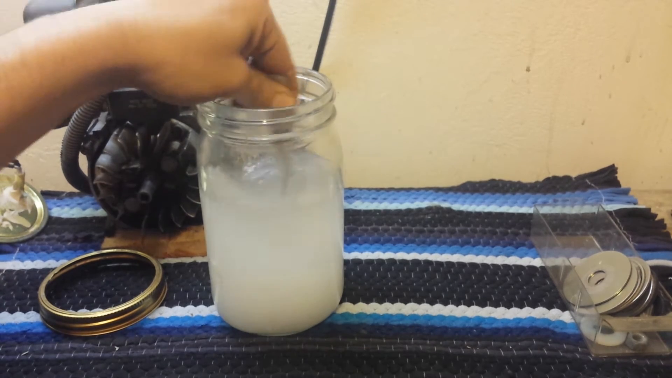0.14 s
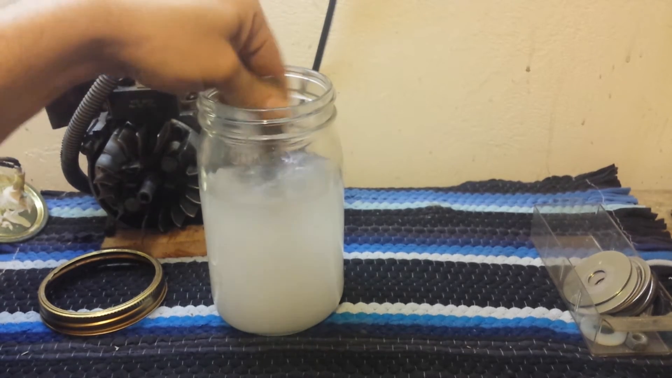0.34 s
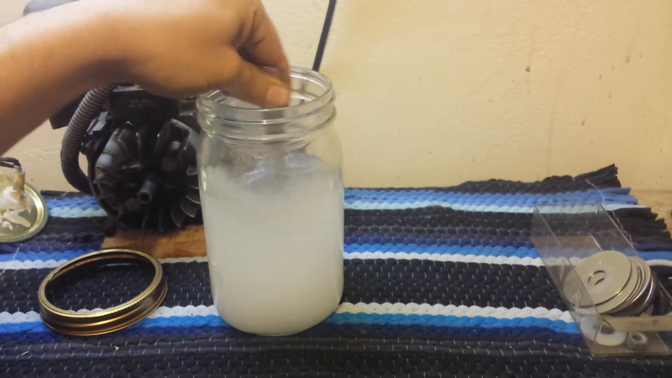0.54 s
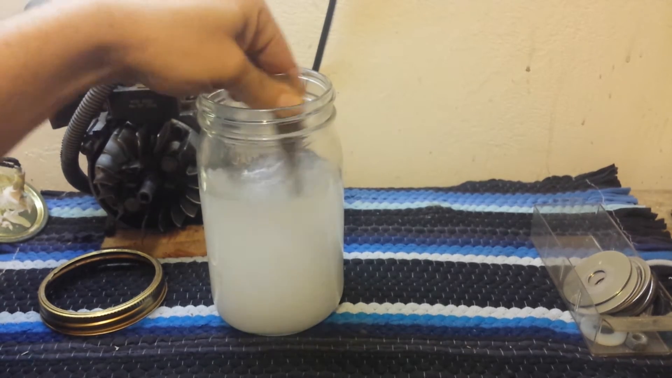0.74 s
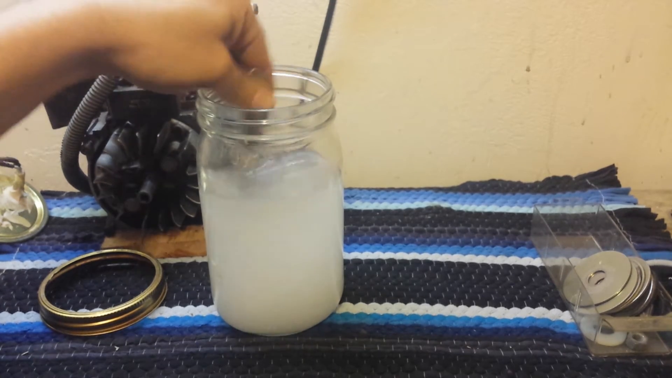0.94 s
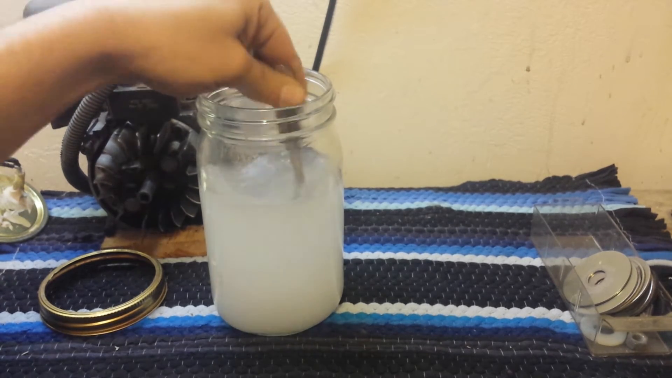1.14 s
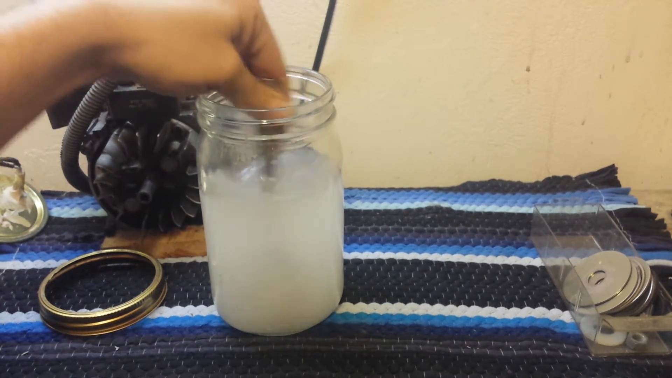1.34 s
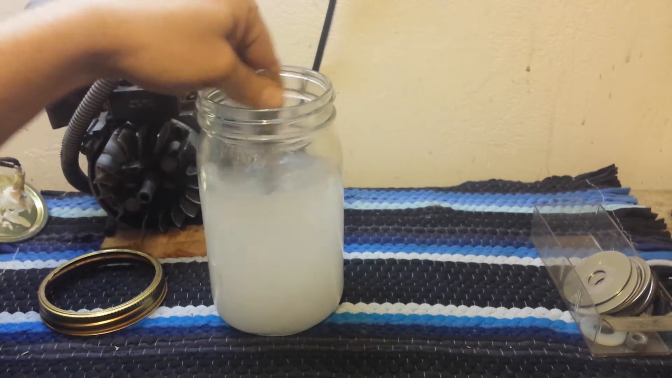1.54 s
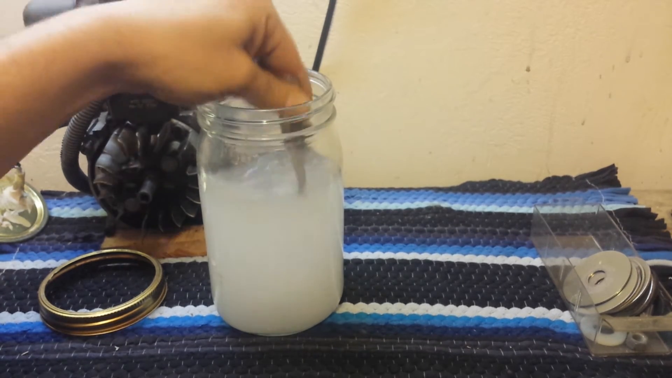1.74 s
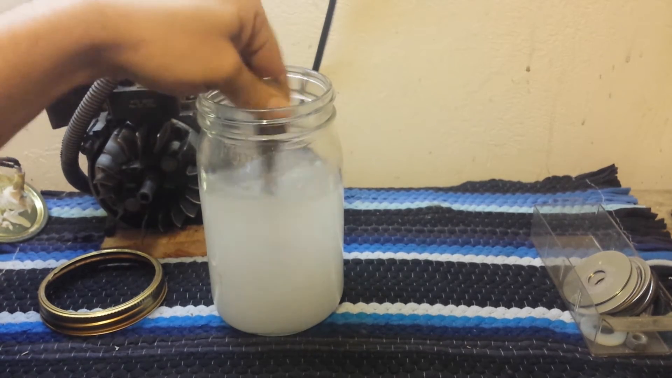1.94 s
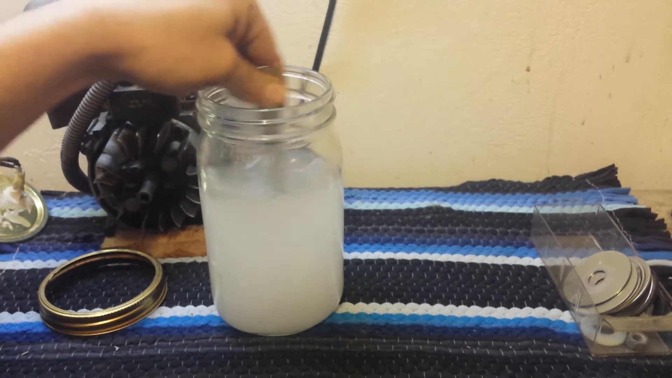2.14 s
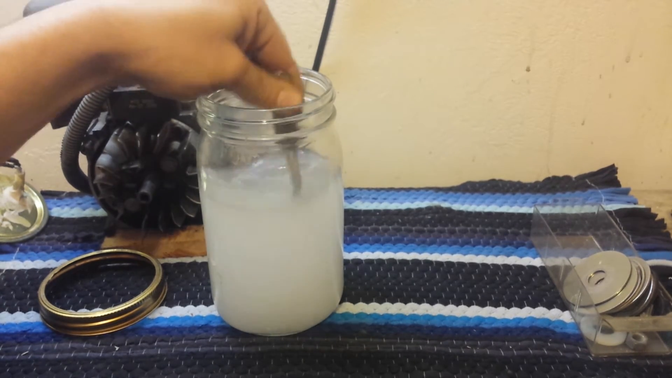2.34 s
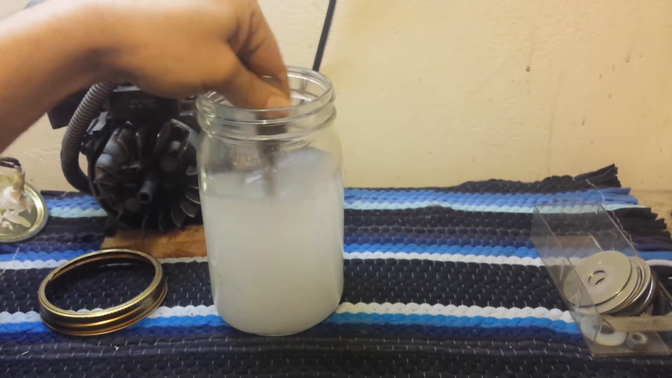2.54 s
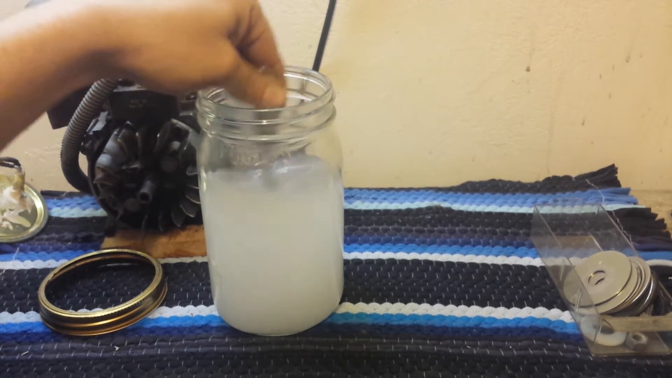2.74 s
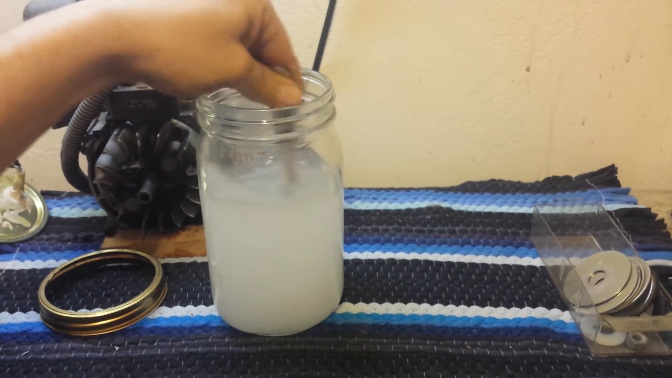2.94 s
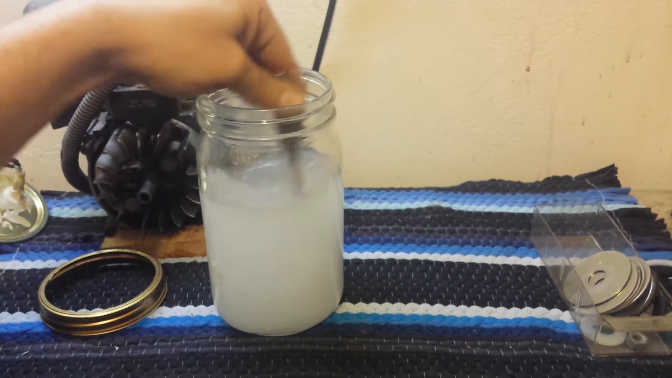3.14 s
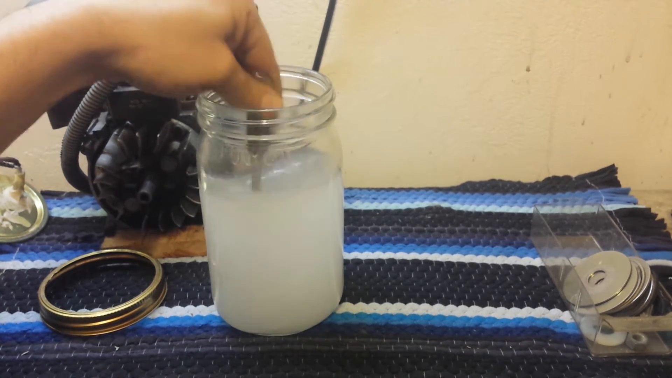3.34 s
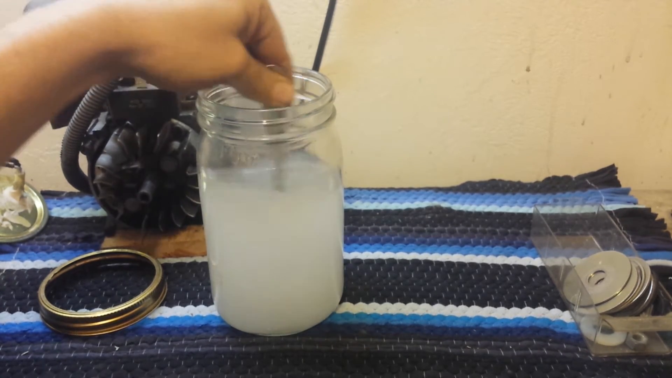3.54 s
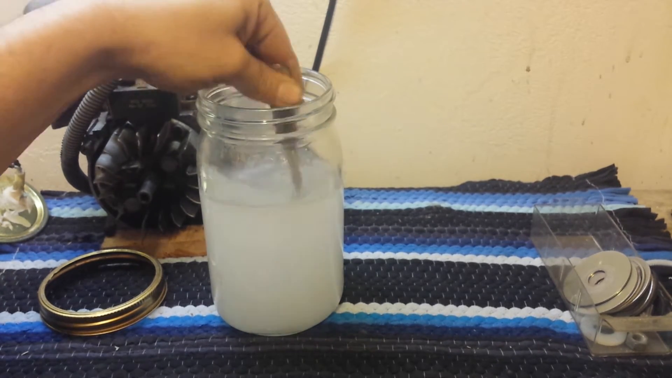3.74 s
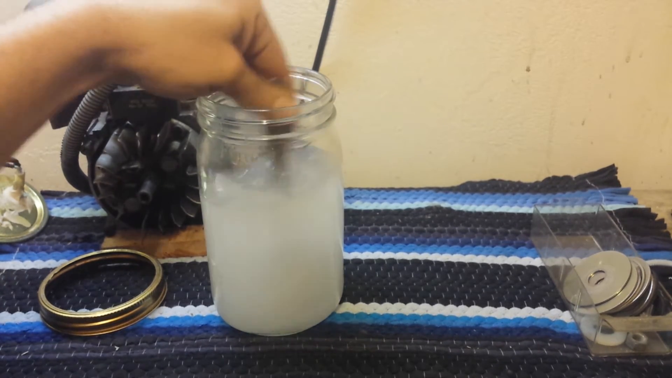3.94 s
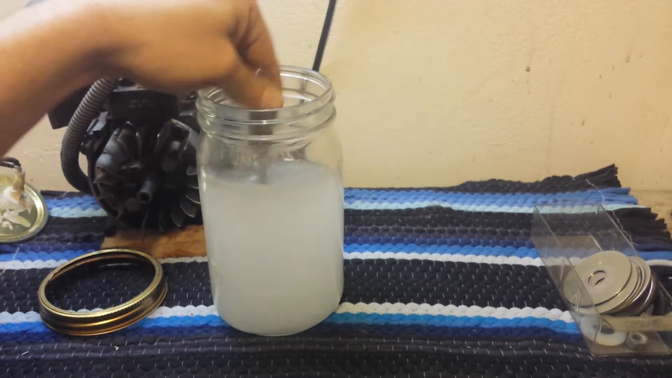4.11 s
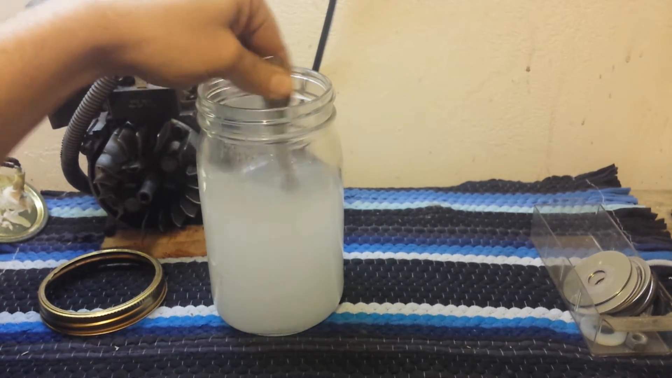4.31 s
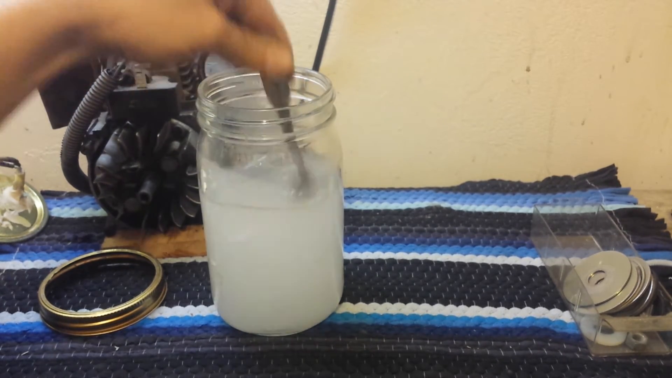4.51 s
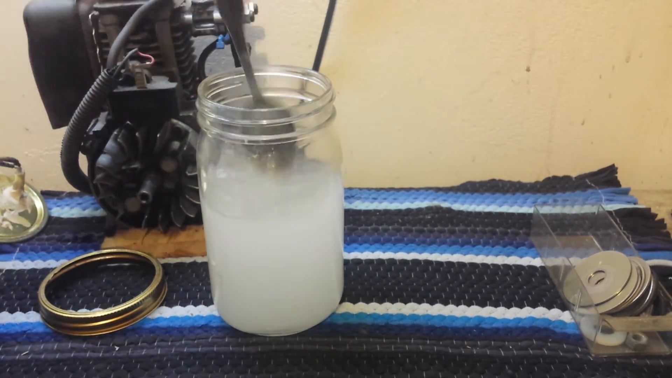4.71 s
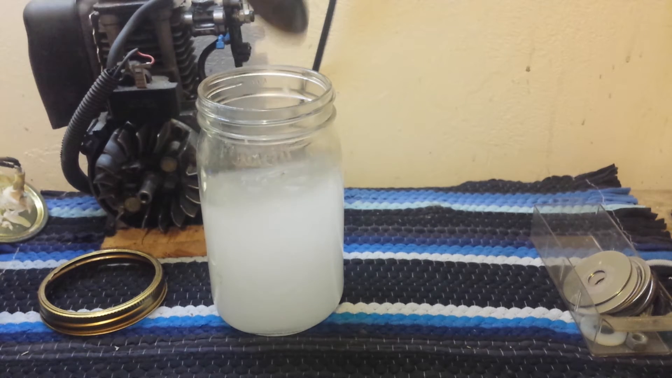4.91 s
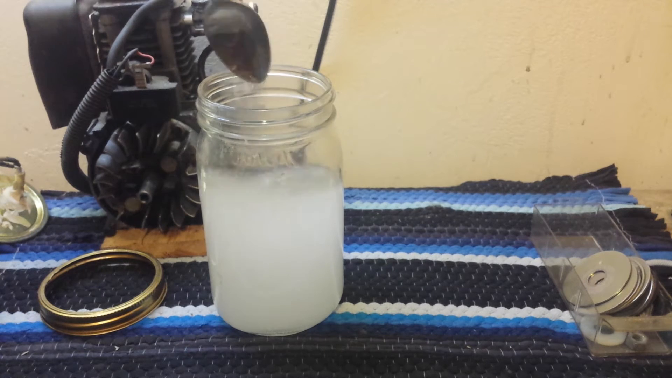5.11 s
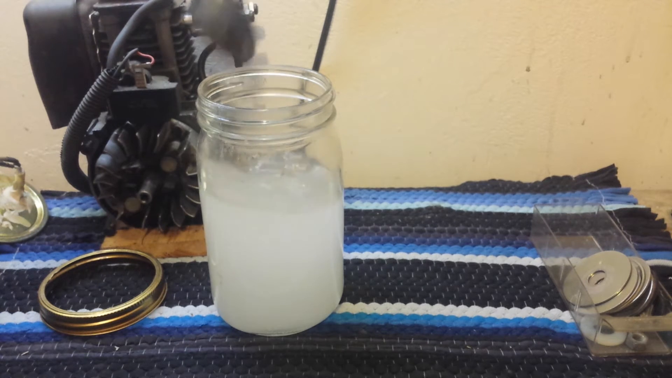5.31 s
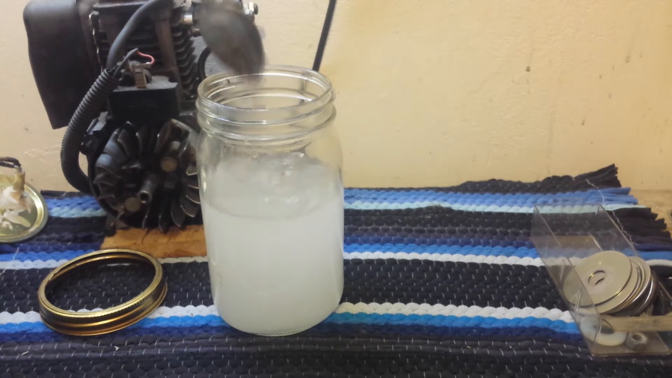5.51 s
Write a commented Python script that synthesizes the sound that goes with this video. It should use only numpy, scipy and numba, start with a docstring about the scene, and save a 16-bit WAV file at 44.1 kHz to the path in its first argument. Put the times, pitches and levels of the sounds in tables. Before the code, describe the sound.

A metal spoon clinks briskly against a water-filled glass jar while stirring, each bright strike ringing briefly in a small room.

```python
"""At the start a ring is already fading, over a steady hum and hiss; a metal spoon stirs a jar of cloudy water.
Each blow on the glass rings wall and spoon as fading sines, with a crack of noise; a small room answers.
Some blows also knock the air in the neck and rock the jar on its cloth; noise ticks and gliding bubbles follow.
Near the end the water gurgles, the spoon is lifted out and a few ticks remain.
Throughout, the recorder turns itself down in the quiet and limits the peaks."""
import sys
import numpy as np
from scipy import signal
from scipy.fft import rfft, irfft
from scipy.io import wavfile
from scipy.ndimage import uniform_filter1d, minimum_filter1d
from numba import njit

SR = 44100
rng = np.random.default_rng(int(sys.argv[2]) if len(sys.argv) > 2 else 0)


def volts(x):
    """Linear amplitude factor 10**(x/20) for a level x in dB, scalar or array-like."""
    e = np.asarray(x, float) / 20
    return 10 ** e


def output_pcm(signal):
    """Save a mono or channel-first signal as 16-bit PCM at the path in sys.argv[1].

    Samples are clipped to [-1, 1] before scaling.
    """
    pcm = np.clip(np.atleast_2d(signal).T, -1, 1) * 32767
    wavfile.write(sys.argv[1], SR, np.round(pcm).astype(np.int16))


N = 245485
T = np.arange(N) / SR  # time of each sample in seconds

# All dB in these tables are relative; the functions add their own offsets.
# Spoon blows on the glass; the first row is a ring already fading at the start.
# Each row: start in seconds, strength in dB, lowest ring after the blow in dB,
# spot of contact around the jar and up the wall (plain numbers, about -3 to 3).
BLOWS = [(0.0, -44.5, -24, 0.9, 1.9), (0.0778, -30.5, -29.5, -0.5, -1.5),
         (0.0844, -22.5, -25.5, 0.73, -0.7), (0.191, -26.5, -28.5, 1.08, 3), (0.2884, -34.5, -20, 2.5, 0),
         (0.3267, -27, -19.5, 1.35, 0), (0.4655, -24.5, -20.5, 0.34, -0.33),
         (0.559, -20.5, -19.5, 0.25, 2.42), (0.5937, -32, -24, 2.24, 3.5), (0.6812, -27, -19, 2.37, 0.5),
         (0.828, -31.5, -22.5, 0.5, -0.15), (0.9124, -25.5, -20, 0.2, 3),
         (1.0335, -19.5, -9.5, -0.13, -0.54), (1.176, -32, -20.5, -0.14, -1.8),
         (1.2599, -23, -12.5, -0.03, 1.3), (1.488, -43, -26.5, -0.7, 0), (1.634, -34.5, -32, 1.64, -0.6),
         (1.7638, -31, -28, 0.53, -0.05), (1.8351, -41, -34, 0.6, 0), (1.9458, -32.5, -29.5, 1.95, -0.36),
         (2.0859, -28.5, -20, 0.4, 0.26), (2.2676, -29, -27, 1.99, 0), (2.5804, -37, -47.5, 1.59, 0.85),
         (2.7693, -38.5, -26, -0.2, 0), (2.846, -29, -25, 1.1, 1.27), (2.969, -28.5, -14.5, 0.8, 0.1),
         (3.0442, -27.5, -7.5, -1.3, 2.5), (3.108, -26, -10, 1.76, 2), (3.234, -26.5, -16, 0.3, -0.7),
         (3.323, -25.5, -12, -0.3, 2.5), (3.411, -35.5, -17, -0.4, 1.5), (3.6765, -31, -30, 1.67, -0.33),
         (3.9476, -27.5, -15.5, -0.13, -1.46), (4.1985, -31, -29.5, 2, -0.75),
         (4.5723, -25, -20.5, -1.5, -0.8)]
# Hollow knocks of the neck air with some blows, and gurgles near 4.5 s.
# Each row: start in seconds, neck air in dB, thud in dB, table boom in dB.
KNOCKS = [(0.293, -35.5, -49.5, -49), (0.681, -36, -56, -60), (1.034, -56, -54, -62),
          (1.635, -44, -52.5, -59), (1.946, -39.5, -51.5, -66), (2.266, -39, -48.5, -53),
          (2.579, -44, -47.5, -57), (2.845, -35, -44, -49), (3.106, -33.5, -45.5, -50.5),
          (3.236, -43.5, -47, -60.5), (3.411, -43.5, -47, -60), (3.675, -40, -49.5, -57),
          (3.948, -46, -56, -60.5), (4.197, -38.5, -51.5, -50), (4.236, -41, -59.5, -69),
          (4.459, -45.5, -76.5, -65.5), (4.494, -46.5, -68, -70), (4.537, -48, -67, -62.5),
          (4.575, -20, -65, -69.5)]
# Light touches and drips. Each row: start in seconds, level in dB, rough centre in Hz.
TICKS = [(0.877, -31, 5400), (1.598, -54, 4830), (4.175, -46.5, 3977), (4.391, -45, 5400),
         (4.407, -45, 3636), (4.429, -44, 2695), (4.457, -40.5, 5050), (4.499, -52.5, 5600),
         (4.528, -43.5, 2670), (4.556, -50, 5600), (4.575, -24.5, 2907), (4.76, -51.5, 5300),
         (4.827, -49.5, 4560), (4.916, -53.5, 6460), (5.06, -45.5, 444), (5.301, -44, 4886),
         (5.514, -53.5, 5160)]
# Lowest wall rings. Each row: pitch in Hz (the first row follows the swirl instead), level in dB,
# time to fade by 60 dB in seconds at usual damping, left minus right in dB, lag of the left in radians,
# then dB gained per unit of contact around the jar, of contact up the wall and of the timbre control.
LOW_MODES = [(1535, -0.5, 0.69, -4.6, 1.835, 0.12, 0.47, 0.17), (1631.3, -11, 0.97, 2, 2.5, .5, .5, 3.4)]
# Air in the neck. Each row: the first five columns of the lowest wall rings, with no change of damping.
NECK_MODES = [(794, -2, 0.14, .5, .5), (733, 0, 0.09, 0.3, 0.4), (680, -10, 0.09, 0.84, 0.31)]
# Higher wall rings. Each row: the same eight columns as the lowest wall rings.
WALL_MODES = [(2138, -2, 0.49, 7, 2.03, -4.5, 3.1, 1.5), (2016.4, -27.5, 0.25, 1, 0.88, -0.5, 11.8, -0.5),
              (2368, -13, 0.23, -6, 0.82, 1.5, 0.6, 0.5), (2666, -3.5, 0.42, 2.5, 0.03, 2.17, 0.76, 1.2),
              (3043, -9.5, 0.15, 6, 0.3, 2.5, 0.47, 2.0), (3136, -19, 0.2, 7, 1.8, 8, 3.2, -3),
              (3350, -9, 0.3, 3.5, 0.67, -3.5, 4.83, -0.5), (3405, -2, 0.29, 0, 1.5, -3, 1.1, 3.5)]
# Spoon rings. Each row: the same eight columns, but the fading is sped up further.
SPOON_MODES = [(4242, -6, 0.12, 1.5, 1.5, 10.5, 1.5, -5.5), (4340, -18.5, 0.13, 2, 6.5, 7, -2, -1),
               (4570, -4.5, 0.099, 8.5, 1, 6, 0, 0), (4650, -12, 0.12, -1, -2.5, 5.5, -2.1, 0.3),
               (4806, -11.5, 0.11, 14.5, -5.5, 6, -9, -3), (4923, -1, 0.057, 6, -0.5, 8, 0.5, -0.5),
               (4706, -4, 0.17, -2, -3, 1.6, 0, 0.5), (4900, -17, 0.079, 9, 14.5, 0.5, -3.5, 1.5),
               (5130, 1.5, 0.17, 5, -3.5, 4.5, -1, -1.3), (5230, 2.5, 0.063, 4, -3.5, 5, -5.5, 1.5),
               (5300.0, 0, 0.085, 8, 1.9, -9, -5, 6.5), (5400.0, 1.5, 0.19, 3.5, 0, -1, -9, 1.4),
               (5403, -8.5, 0.025, 7.5, 2.7, -1.6, -7, 6.5), (5645, -2, 0.18, 5.5, 2, 1, -4, 4),
               (5910, -12, 0.24, 8, 2, 5, 0.4, 3.5), (5400, -13.5, 0.1, 10, -1.6, -6, 5.5, 2),
               (5950, 1.5, 0.1397, 0.5, 1, -3, -2.5, 1), (6070, -19.5, 0.066, 9.5, 2.6, -7, -1, -8.5),
               (6750, -16.5, 0.057, 7.5, -7.5, -6, -8.5, -8.5), (6930, -10, 0.14, 4, 4, -2.5, -5, -4.5),
               (6430, 0, 0.065, 15.5, -4.5, -4, -1.5, 2.5), (6780, -1.5, 0.12, 0.5, 0.5, -3.1, -8.5, 3.5),
               (6630, -21.5, 0.15, -4, -2, -1.2, -4.5, 1), (6560, -17.5, 0.05, 5, 7, 0, -2.1, -5),
               (7440, -26, 0.05, 0.5, 3.2, 5, 1, -5), (7580, -15.5, 0.1, -1.5, 7, -3, -8.5, 1.5),
               (7630, -18, 0.13, -4.5, 1.2, -9, -10, 5.5)]
# Highest, thin rings. Each row: the same eight columns, with no change of damping.
EDGE_MODES = [(8000, -32, 0.13, -3.5, -4, -2.8, 4, -1), (8960, -25.5, 0.066, -11, -6, 6, -2, 0),
              (8800, -31.5, 0.12, 0.5, 5.5, 8, 0, -1), (9510, -25, 0.18, -7, 2, -5, -5, 1),
              (10900, -28, 0.11, -4, -6, -6, -11, -5), (10180, -31, 0.071, 1.5, -4.7, 2.9, 8.5, -1.5),
              (10400, -36.5, 0.1, 5, 1, 4, 0, 3.5), (12100, -45.5, 0.11, 3.5, -10.5, -2, 4.6, 6.7),
              (11380.0, -32.5, 0.1, 2.5, -7.5, -4, -10.3, -1), (12300, -34.5, 0.1, -1, -8, -1, -2.5, 2.5)]
# Bubbles pulled under. Each row: start in seconds, length in seconds, start in Hz, end in Hz, level in dB.
GULPS = [(1.64, 0.014, 1086, 1165, -33), (1.713, 0.043, 553, 614, -61.5), (1.766, 0.055, 532, 790, -42),
         (1.815, 0.029, 759, 683, -47.5), (4.452, 0.025, 580, 628, -49), (4.531, 0.048, 603, 565, -48.5)]
# Colour of the crack of a blow. Each row: frequency in Hz, level in dB per Hz.
CRACK_COLOUR = [(100, -31), (500, -13), (1200, -10), (2500, -1), (3800, -8.5), (5000, -10), (7000, -4.5),
                (8500, -13.5), (12000, -28), (15000, -36.5), (16500, -55)]
# Colour of the hum and hiss. Each row: frequency in Hz, level in dB.
HOUSE_COLOUR = [(20, -26), (45, -15), (62, -13), (73, -1), (88, -17.5), (130, -8), (300, -18), (900, -22),
                (2000, -23.5), (5000, -24.5), (10000, -28.5), (15000, -34), (16500, -37.5)]
# Third control of the timbre of the blows. Each row: time in seconds, plain number (-3 to 3).
TIMBRE = [(0.0, 1), (0.33, 0.4), (0.8, 2.86), (1.05, -0.84), (1.26, 0.2), (1.6, -0.5), (2.1, 0.54),
          (2.7, 0.5), (2.85, -1), (3.0, 0.8), (3.12, 0.16), (3.42, -1.64), (3.68, -1.1), (3.95, -1.6),
          (4.2, -1.5), (4.6, -0.5)]
# Once a turn the swirl piles up against the wall. Each row: time in seconds, lowest ring under the wave in Hz,
# lowest ring half a turn later in Hz, damping of the wall in this turn (1 = usual).
TURNS = [(-0.1, 1578, 1556, 1.55), (0.232, 1532, 1553, 0.95), (0.588, 1523, 1546, 1.065),
         (0.961, 1520, 1538, 1.08), (1.278, 1519, 1540, 0.72), (1.579, 1523, 1540, 1.41),
         (1.881, 1514, 1542, 1.32), (2.21, 1518, 1550, 0.99), (2.52, 1538, 1548, 1.16),
         (2.78, 1530, 1546, 1.2), (3.05, 1527, 1542, 1.25), (3.329, 1515, 1554, 1.28),
         (3.602, 1539, 1546, 2.02), (3.859, 1519, 1545, 1.34), (4.052, 1503, 1536, 2.21),
         (4.349, 1519, 1545, 1.43), (4.56, 1504, 1596, 1.64), (4.839, 1545, 1552, 1.9),
         (5.1, 1548, 1552, 2.9)]
# Share of its pitch that each higher wall ring loses from trough to crest, one number per ring.
WALL_SAG = [0.022, 0.0035, 0.004, .004, 0.0022, .004, .022, 0.0065]
# Clear rings change as the stirring moves up and down. Each row: time in seconds, third ring (2138 Hz) in dB,
# sixth ring (2666 Hz) in dB.
SINGING = [(0.0, 2, -1), (0.55, -4.5, -4), (0.9, -6, -1), (1.26, 5, -1), (1.699, 0, -2.5), (2.101, -5, 1),
           (2.3, 4.5, -13), (2.579, -6, 5), (2.9, -5.5, 4.5), (3.1, -1, 4), (3.35, 7.5, 4.5), (3.7, -2, -1),
           (3.951, 10.5, 9), (4.2, 2.5, -2.5), (4.57, -10, -16.5)]
# Share of that change each higher wall ring takes. Each row: one number per ring;
# the first row is for the third ring, the second for the sixth, at 2666 Hz.
SINGING_SHARES = [(1, 0.0026, 0.0077, 0.15, 0, 0.0038, 0.4, 0),
                  (0.12, 0.027, 0, 1, 0.0011, 0.0014, 0.036, 0.012)]


def coloured(points, channels=1):
    """Noise with the given spectrum, scaled to an rms of 1."""
    hz, db = np.transpose(points)
    f = np.arange(N // 2 + 1) * SR / N + 1
    spectrum = rfft(rng.standard_normal((channels, N)))
    noise = irfft(spectrum * volts(np.interp(np.log(f), np.log(hz), db)), N)
    return noise / noise.std()


def wide(noise, like):
    """Two noises blended so that left and right are partly alike."""
    sides = np.array([[1], [-1]]) * noise[1]
    return noise[0] * np.sqrt(like) + sides * np.sqrt(1 - like)


def smooth(x, rise_s):
    """One-pole smoothing: the output creeps towards the input."""
    p = np.exp(-1 / (rise_s * SR))
    return signal.lfilter([1 - p], [1, -p], x)


def background():
    """Steady hum and hiss of the house; only the bass is alike in both channels."""
    noise = coloured(HOUSE_COLOUR, channels=2)
    bass = signal.sosfilt(signal.butter(2, 900, fs=SR, output="sos"), noise)
    hiss = noise - bass
    hum = wide(bass, 0.91) * volts(np.array([[1.2], [-1.2]]))  # a little louder on the left
    return volts(-60.5) * (hiss + hum)


def fading(times, sizes, t60):
    """Each blow replaces what still rang with its own decay."""
    last = np.searchsorted(times, T, side="right") - 1
    since = T - times[last]
    decay = sizes[last] * np.exp(-np.log(1000) * np.abs(since) / t60)
    return np.where(last >= 0, decay, 0)  # silent before the first blow


@njit
def add(out, starts, sizes, tune, hz, loss, rise, left, right):
    """One mode: each blow sets a new swing, which the sound follows within the rise time."""
    goal, swing, turn, k = 0j, 0j, 1 + 0j, 0
    step = turn
    for i in range(len(hz)):
        if k < len(starts) and i >= starts[k]:
            goal, k = sizes[k], k + 1
        if i & 31 == 0:  # every 32 samples: take the new pitch and tidy the length of the pointer
            step = np.exp(2j * np.pi * hz[i] * tune[max(k - 1, 0)] / SR)
            turn = turn / abs(turn)
        goal = goal * (1 - loss[i]) + 1e-18
        swing += rise * (goal - swing)
        turn *= step
        out[0, i] += (swing * turn * left).imag
        out[1, i] += (swing * turn).imag * right


def ring(modes, times, db, scatter_db, rise_s, jump, detune, clock=T, glide=None, waver=0., sag=None, wave=0.):
    """Modes struck at the given times; sizes, phases and pitches can vary from blow to blow.

    jump is the scatter of phase in radians; detune and waver are shares of the pitch.
    A clock that runs faster makes the modes fade faster."""
    chance = rng.standard_normal((len(times), len(modes), 3))
    starts = np.round(times * SR).astype(np.int64)
    out = np.zeros((2, N))
    pace = np.gradient(clock) * np.log(1000)
    rise = 1 - np.exp(-1 / (rise_s * SR))
    # moving water and fingers load the metal unevenly, so each line wavers on its own
    walk = smooth(smooth(rng.standard_normal(N), .004), .004)
    walk *= waver / walk.std()
    for k, (hz, mode_db, t60, pan_db, lag) in enumerate(np.array(modes)[:, :5]):
        phases = np.exp(1j * jump * chance[:, k, 1])
        sizes = volts(db[:, k] + mode_db + scatter_db * chance[:, k, 0]) * phases
        if k == 0 and glide is not None:
            pitch = glide
        else:
            pitch = hz * (1 + np.roll(walk, k * N // len(modes)))
        if sag is not None:
            pitch = pitch * (1 - sag[k] * wave)
        tune = 1 + detune * chance[:, k, 2]
        left = volts(pan_db / 2) * np.exp(-1j * lag)
        right = float(volts(-pan_db / 2))
        add(out, starts, sizes, tune, pitch, pace / t60, rise, left, right)
    return out


def swirl():
    """Height of the wave at the wall (-.5 to .5), the pitch of the lowest ring and the damping of the wall."""
    s, under_hz, after_hz, damping = np.transpose(TURNS)
    peaked = 1.5  # 1 = a round wave, more = short crest and long trough
    turns = np.interp(T, s, np.arange(len(s)))
    wave = np.abs(np.cos(np.pi * turns)) ** (2 * peaked) - .5
    middle = s + np.gradient(s) / 2  # about half a turn later
    under = np.interp(T, s, under_hz)
    after = np.interp(T, middle, after_hz)
    low_hz = after + (under - after) * (wave + .5)
    # the crest damps the wall more than the trough, by this share of the turn's damping
    return wave, low_hz, np.interp(T, middle, damping) * (1 + 0.17 * wave)


def swarm(times, db, count):
    """Many small modes, slightly detuned at every blow; the higher, the shorter."""
    hz = np.linspace(2900, 15600, count)
    colour_hz, colour_db = np.transpose(CRACK_COLOUR)
    mode_db = np.interp(np.log(hz), np.log(colour_hz), colour_db) + 5.0 * np.log2(hz / 5000)
    t60 = 0.083 * (5000 / hz) ** 0.48
    place = rng.uniform(-1, 1, (count, 2))
    modes = np.array([hz, mode_db, t60, 4 * place[:, 0], np.pi * place[:, 1]]).T
    return ring(modes, times, np.outer(db, np.ones(count)) - 1, scatter_db=5.5, rise_s=0.00044,
                jump=2.7, detune=.015, waver=.002)


def clinks():
    """The long wall rings, and apart from them the bright short part of each blow."""
    s, blow_db, ring_db, *controls = np.transpose(BLOWS)
    controls.append(np.interp(s, *np.transpose(TIMBRE)))
    controls = np.transpose(controls)
    wave, low_hz, damping = swirl()
    clock = np.cumsum(np.clip(damping, .2, 5)) / SR

    # the three controls decide how strongly each mode is struck
    tables = (LOW_MODES, WALL_MODES, SPOON_MODES, EDGE_MODES)
    low_db, wall_db, spoon_db, edge_db = (controls @ np.array(m)[:, 5:].T for m in tables)
    strike_db = blow_db[:, None]
    when, *sing_db = np.transpose(SINGING)
    singing = np.transpose([np.interp(s, when, c) for c in sing_db])
    wall_db = strike_db + wall_db + singing @ np.array(SINGING_SHARES) + 3.5

    wall = ring(LOW_MODES, s, ring_db[:, None] + low_db + 1.5, scatter_db=1.0, rise_s=0.00076,
                jump=.4, detune=0, clock=clock, glide=low_hz)
    third = ring(WALL_MODES[:1], s, wall_db, scatter_db=1.5, rise_s=.003,
                 jump=.6, detune=0, clock=clock, sag=WALL_SAG[:1], wave=wave)
    wall += volts(-6 * wave) * third  # the wave turns the third ring away from the microphone
    wall += ring(WALL_MODES[1:], s, wall_db[:, 1:], scatter_db=3.6, rise_s=0.0026,
                 jump=2.7, detune=.002, clock=clock, waver=0.00078, sag=WALL_SAG[1:], wave=wave)

    bright = ring(SPOON_MODES, s, strike_db + spoon_db + 3, scatter_db=3.5, rise_s=.0012,
                  jump=3, detune=.004, clock=1.15 * clock, waver=.005)
    bright += ring(EDGE_MODES, s, strike_db + edge_db + 4.5, scatter_db=4.5, rise_s=.0008,
                   jump=3, detune=.005, waver=.002)
    bright += swarm(s, blow_db + .2 + controls @ np.array([-1.5, -.6, .3]), count=52)
    # the spoon chatters along the glass, so the ring is uneven
    chatter = smooth(smooth(rng.standard_normal(N), 0.0023), 0.0023)
    bright *= volts(2.2 * chatter / chatter.std())

    # a short loud crack and a longer soft one
    crack = smooth(fading(s, volts(blow_db - 11), .16), .0015)
    crack += smooth(fading(s, volts(blow_db + 4.5), .03), .0005)
    return wall, bright + crack * wide(coloured(CRACK_COLOUR, channels=2), 0.82)


def room(x, t60, gap_s, wet_db):
    """Direct sound plus a decaying noise tail, unrelated left and right."""
    t = np.arange(int(SR * .5)) / SR
    shape = np.exp(-np.log(1000) * t / t60) * (1 - np.exp(-t / gap_s))
    tail = rng.standard_normal((2, len(t))) * shape
    tail /= np.sqrt((tail ** 2).sum(axis=1, keepdims=True))
    return x + volts(wet_db) * signal.fftconvolve(x, tail, axes=1)[:, :N]


def knocks():
    """The air above the water pops or gurgles, the jar thuds on the cloth and the table booms a moment later."""
    s, neck_db, thud_db, boom_db = np.transpose(KNOCKS)
    # colours: (Hz, dB)
    thud = coloured([(40, -31.5), (110, -1), (180, -4.0), (400, -3.5), (900, -25), (2000, -61.5)], channels=2)
    boom = coloured([(45, -46), (64, -8.5), (75, 8.0), (88, -8.5), (120, -41.0)])
    neck = ring(NECK_MODES, s, np.outer(neck_db + 3.5, np.ones(len(NECK_MODES))), scatter_db=2.9,
                rise_s=0.0017, jump=3, detune=.015, waver=.035)
    low = wide(thud, 0.94) * smooth(fading(s, volts(thud_db + 2.0), .25), 0.0015)
    # smoothed twice, so the boom swells in late
    low += boom * smooth(smooth(fading(s, volts(boom_db + 1.5), 0.52), .025), .025)
    return neck, low * volts(np.array([[1.1], [-1.1]]))


def ticks():
    """Light touches and drips: short bursts of noise around one pitch each."""
    out = np.zeros((2, N))
    noise = wide(rng.standard_normal((2, N)), 0.53)
    tail = np.arange(int(SR * .15)) / SR
    shape = (1 - np.exp(-tail / 0.00033)) * np.exp(-np.log(1000) * tail / 0.13)
    for s, db, hz in TICKS:
        i = int(s * SR)
        burst = noise[:, i:i + len(tail)] * shape[:N - i]
        band = signal.butter(2, [hz / 1.3, hz * 1.18], "band", fs=SR, output="sos")
        pitched = signal.sosfilt(band, burst)
        out[:, i:i + len(tail)] += volts(db) * (2.0 * pitched + 0.12 * burst)
    return out


def gulps():
    """Each bubble pulled under is a soft sine that glides."""
    out = np.zeros(N)
    for s, length, start_hz, end_hz, db in GULPS:
        hz = np.linspace(start_hz, end_hz, int(length * SR))
        tone = np.sin(2 * np.pi * np.cumsum(hz) / SR)
        out[int(s * SR):][:len(hz)] += volts(db) * np.sqrt(np.hanning(len(hz))) * tone
    return out


def scene():
    """All layers together; the short sounds are the ones whose echo is heard."""
    wall, bright = clinks()
    neck, low = knocks()
    short = bright + neck + ticks() + gulps()
    return background() + wall + low + room(short, t60=0.17, gap_s=0.0044, wet_db=-5)


def roll_off(x):
    """The treble ends steeply here."""
    return signal.sosfilt(signal.butter(12, 16820, fs=SR, output="sos"), x)


def record(dry):
    """A downward expander lowers whatever falls under a threshold and lets go slowly; a limiter holds the peaks."""
    power = np.mean(dry ** 2, axis=0)
    loud_db = 10 * np.log10(smooth(power, .015) + .003 * smooth(power, 0.069) + 1e-12)
    gain_db = np.clip(1.7 * (loud_db + 49.5), -14, 0)  # threshold -49.5 dB, at most 14 dB down
    headroom = np.minimum(1, .85 / (np.abs(dry).max(axis=0) + 1e-9))
    limit = uniform_filter1d(minimum_filter1d(headroom, size=400), size=400)
    return roll_off(dry * volts(gain_db) * limit)


dry = scene()
out = record(dry)
output_pcm(out)
```